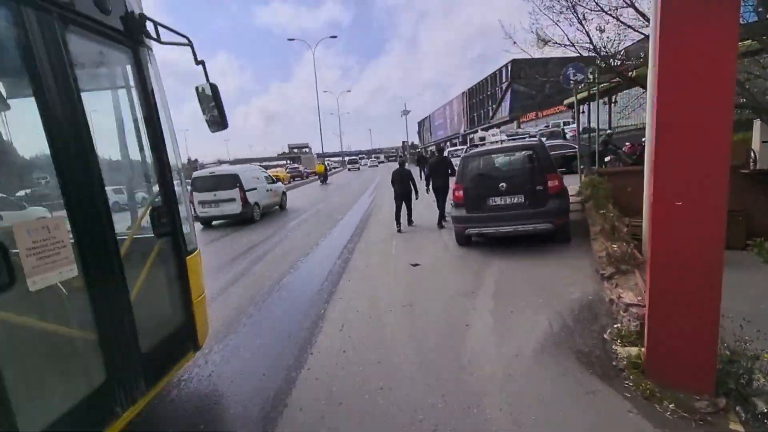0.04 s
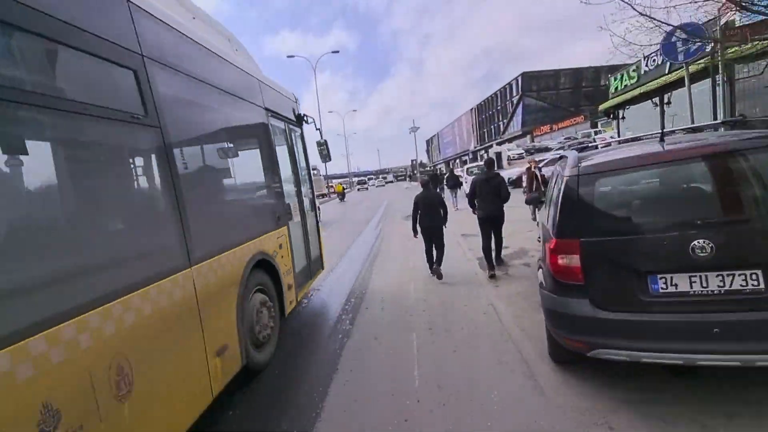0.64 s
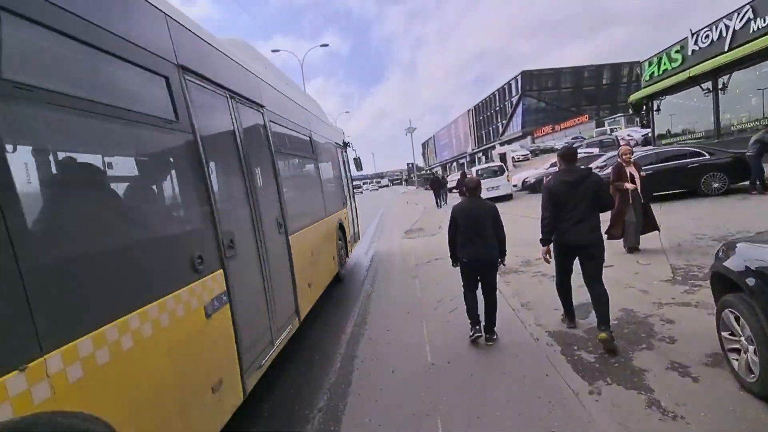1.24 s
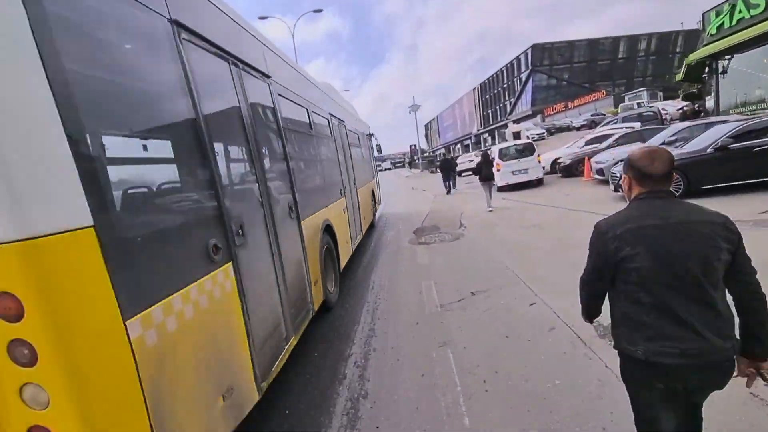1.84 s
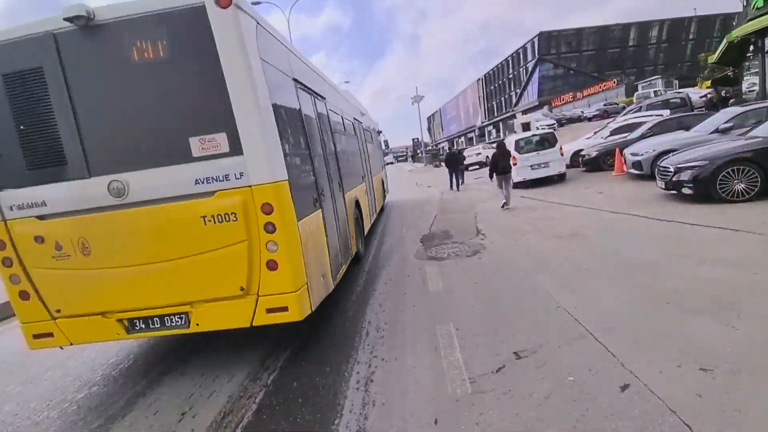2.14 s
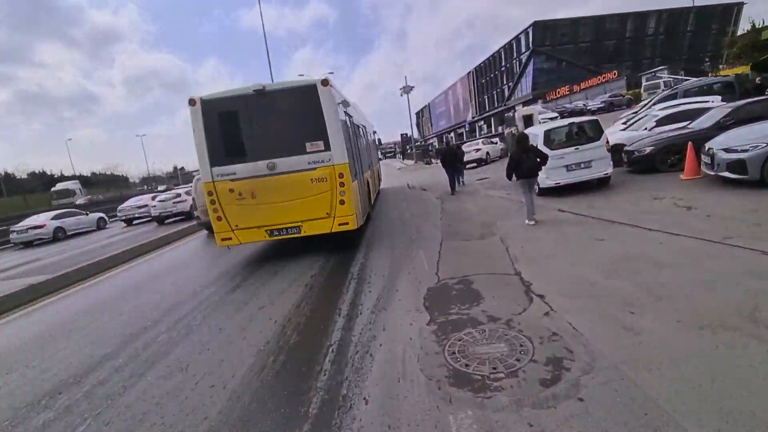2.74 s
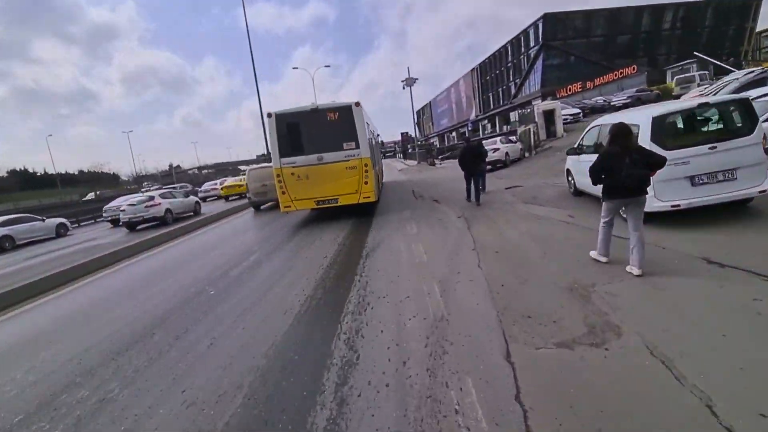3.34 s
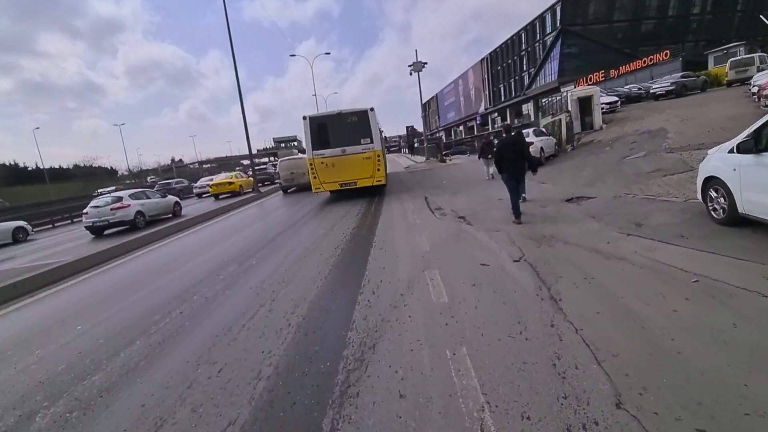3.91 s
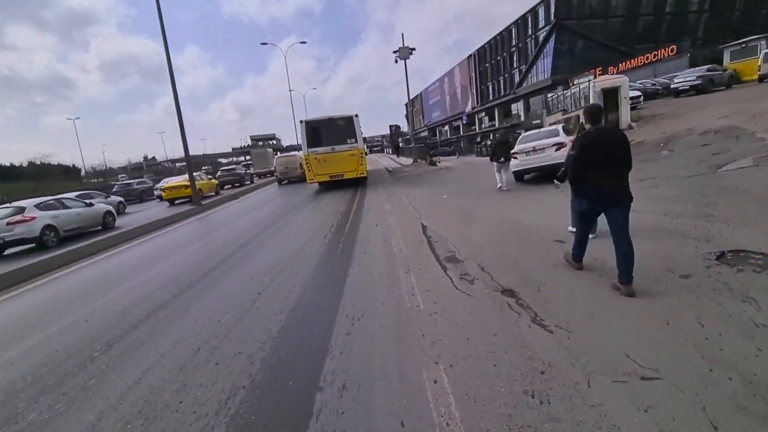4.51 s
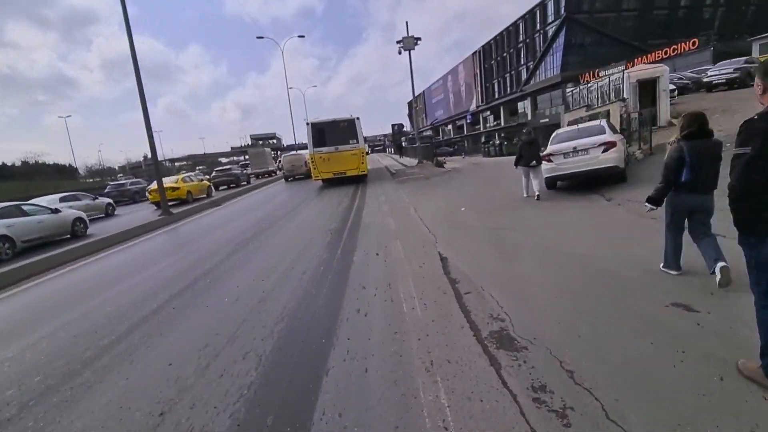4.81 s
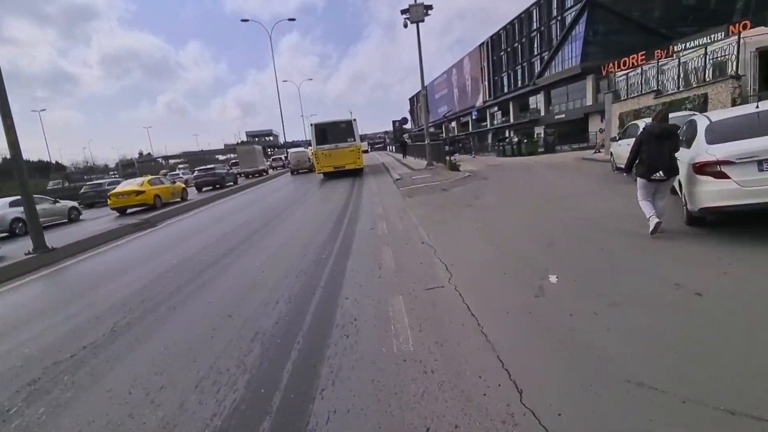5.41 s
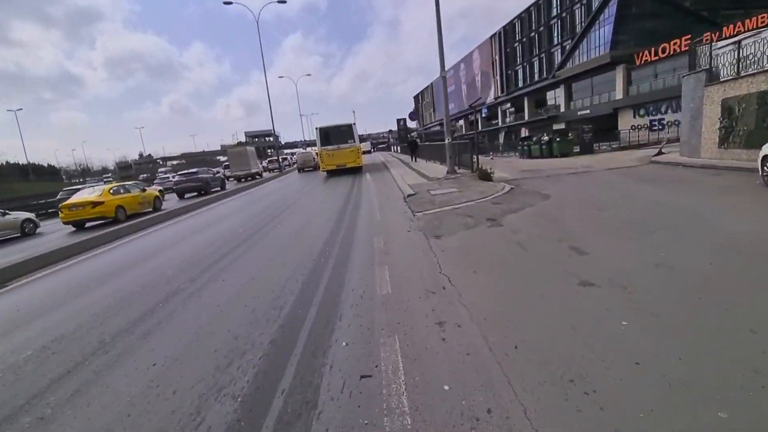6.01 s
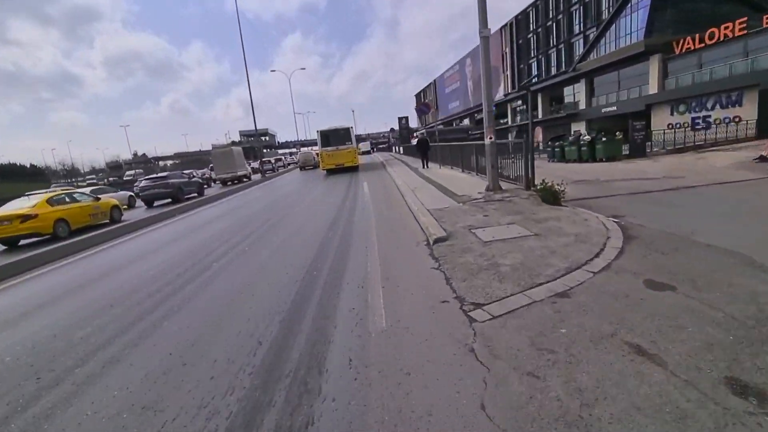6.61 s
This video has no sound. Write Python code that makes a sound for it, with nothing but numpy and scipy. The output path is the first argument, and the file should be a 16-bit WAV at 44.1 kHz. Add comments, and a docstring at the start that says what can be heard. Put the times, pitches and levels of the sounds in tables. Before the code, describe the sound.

Heard from a moving scooter, a low wavering engine drone mixes with the roar of city traffic. A bus passes close on the left with a short diesel knock and two swells of wet tyre hiss, then fades ahead. Rumbling wind gusts hit the microphones as the scooter's pitch slowly rises, and the tyres of oncoming cars ring briefly at the end. The right channel is duller.

```python
"""A scooter gathers speed on a wet city road: its exhaust drones, its belt whines, its gears hum.
A bus overtakes close on the left, its tyres throwing hissing spray, then draws away into the traffic roar.
A diesel engine knocks in the first second; near the end, the tyres of oncoming cars ring.
Gusts of wind buffet the rider's two microphones more and more; the right one is muffled."""
import sys
import numpy as np
from scipy import signal
from scipy.fft import rfft, irfft
from scipy.io import wavfile
from scipy.ndimage import map_coordinates

SR = 44100
rng = np.random.default_rng(int(sys.argv[2]) if len(sys.argv) > 2 else 0)


def inscribe(sig):
    """Save sig as 16-bit PCM at rate SR to the path in sys.argv[1].

    A 1-D sig is mono; a 2-D sig holds one channel per row.
    Samples are clipped to [-1, 1] before scaling.
    """
    pcm = np.round(np.clip(np.atleast_2d(sig).T, -1, 1) * 32767)
    wavfile.write(sys.argv[1], SR, pcm.astype(np.int16))


N = 293706
TIME = np.arange(N) / SR
FREQ = np.maximum(np.arange(N // 2 + 1) * SR / N, 1)
TOP_HZ = 15700  # the microphones cut off above this

# bus wheels going by: alongside_s, passing_s (time to get 45 degrees ahead), spray_db, rush_db
BUS_WHEELS = [(.5, 0.42, -34.5, -35), (1.53, 0.56, -32, -42)]


def exhaust(phase):
    """The scooter's silencer leaves a deep, wavering drone with fainter overtones above it."""
    # slow rise and fall of the drone: time_s, level_db
    drone_levels = [(0, -23), (.1, -15), (.5, -12), (2.0, -12.5), (3.12, -14.5), (3.32, -17.5),
                    (3.75, -18.5), (3.95, -15.5), (4.5, -16.5), (5.5, -20), (6.2, -25.5), (6.66, -19.5)]
    # brief dips of the drone: start_s, length_s, depth_db
    dips = [(4.02, 0.41, 6.5), (4.732, 0.16, 7), (5.092, 0.066, 6), (5.607, 0.15, 4), (5.809, 0.28, 15)]
    # the tone an octave above the drone: time_s, level_db
    octave_levels = [(0, -30), (.5, -29), (.65, -35), (1.2, -34), (1.65, -30.5), (2.1, -34.5), (2.78, -30),
                     (2.95, -38), (3.8, -33), (4.5, -40), (5.5, -37), (6.0, -46), (6.66, -38)]
    # higher overtones: pitch_multiple, relative_db
    overtone_levels = [(3, -6.5), (4, -10), (5, -8), (6, -9.5)]
    drone_db, = curves(drone_levels)
    dip_db = sum(db * (fade_in(s, .012) - fade_in(s + length, .012)) for s, length, db in dips)
    drone = np.sin(phase) * gain(drone_db - dip_db + .38 * wander(8))
    octave = np.sin(2 * phase) * gain(*curves(octave_levels))
    overtones = sum(gain(db + 1.6 * wander(1.2)) * np.sin(multiple * phase + rng.uniform(0, 2 * np.pi))
                    for multiple, db in overtone_levels)
    overtones *= gain(-34 - 6 * fade_in(3.1, .38))  # they sink once the wind is up
    return np.sqrt(2) * (drone + octave + overtones)


def drive():
    """The scooter's belt whines along with the engine; its gears hum along with the road speed."""
    # belt whine: time_s, pitch_hz, level_db
    belt = [(0, 412, -33), (.5, 415, -34), (.65, 414, -41), (.9, 414, -36), (1.15, 410, -41),
            (1.33, 400, -35), (1.55, 403, -31), (1.75, 406, -35), (2.2, 410, -35), (3.0, 420, -37),
            (3.9, 435, -40), (4.5, 433, -46), (6.66, 457, -44)]
    # gear hum: time_s, pitch_hz, level_db
    gears = [(0, 200, -39), (.6, 203, -39), (.85, 202, -34), (1.15, 200, -36), (1.4, 200, -42),
             (3.1, 209, -41), (3.7, 224, -39), (4.25, 243, -36), (4.5, 250, -45), (4.8, 256, -39),
             (5.5, 268, -45), (6.0, 280, -48), (6.66, 295, -41)]
    return whine(belt, wobble=.0015, flutter_db=1.2) + whine(gears, wobble=.0105, flutter_db=3.5)


def whine(table, wobble, flutter_db):
    """A turning part makes one tone, a little unsteady in pitch and loudness."""
    hz, db = curves(table)
    return np.sqrt(2) * np.sin(spin(hz, wobble)) * gain(db + flutter_db * wander(8.9))


def bus_engine():
    """As the side and tail of the bus go by, different overtones of its engine stand out."""
    # how fast the engine fires: time_s, rate_hz
    firing_rates = [(1.3, 56.98), (1.9, 57.6), (2.3, 59.2), (2.7, 59.8), (3.0, 61.5)]
    # its overtones: pitch_multiple, loudest_s, width_s, level_db
    overtones = [(4, 1.8, 0.66, -34.5), (5, 2.65, 0.28, -36), (6, 1.76, 0.39, -36)]
    phase = spin(*curves(firing_rates), wobble=.003)
    return sum(np.sqrt(2) * np.sin(multiple * phase) * swell(s, width) * gain(db + 1.5 * wander(9.1))
               for multiple, s, width, db in overtones)


def spray():
    """Countless droplets fly off each wet bus tyre and trail behind in a hissing cloud."""
    # tone of the spray: pitch_hz, relative_db
    spray_tone = [(1200, -26), (2400, -7), (3100, 1.5), (4400, 1.5), (5300, -1.5), (6300, -0.5), (6900, -2),
                  (7300, 2), (8200, -1), (9100, 0.5), (9900, -3), (10600, -2.5), (13500, -3), (15500, -6)]
    drop_sizes = np.minimum(rng.exponential(size=N // 16 + 1), 6)
    drops = stereo_noise(shared=.15) * gain(1.23 * np.repeat(drop_sizes, 16)[:N])
    hiss = shape_tone(spray_echo(drops), spray_tone)
    # the finest hiss is lost as the bus draws away
    far = np.clip((TIME - .94) / 1.3, 0, 1)
    hiss = (1 - far) * hiss + far * shape_tone(hiss, [(7000, 0), (13000, -7)])
    hiss = normalise(shimmer(hiss, band_hz=700, depth_db=1.3, rate_hz=9))
    trail_s, cloud_s = .022, 2.214  # the spray's lag behind a wheel; when the cloud is nearest
    wheels = [gain(db) * pass_by(s + trail_s, passing_s) for s, passing_s, db, _ in BUS_WHEELS]
    cloud = gain(-31) * swell(cloud_s, .5)
    wet_road = gain(-39 - 2 * np.abs(TIME - cloud_s))
    return hiss * combine(*wheels, cloud, wet_road)


def spray_echo(hiss):
    """A surface by the microphones reflects the hiss, later as a wheel moves ahead: the whoosh falls."""
    # each wheel's echo: alongside_s, passing_s, strongest_s, width_s, strength (0-1)
    echoes = [(.277, .868, .73, .29, .31), (1.4, .517, 1.636, .21, .21)]
    side_lag_s, ahead_lag_s, edge_lag_s = .000131, .000304, .000055
    # from about 2.4 s on, a steady echo sets in
    out = hiss + .17 * fade_in(2.41, .12) * delay(hiss, lag_s=.000284)
    for alongside_s, passing_s, strongest_s, width_s, strength in echoes:
        angle = np.arctan((TIME - alongside_s) / passing_s)
        lag_s = side_lag_s + (ahead_lag_s - side_lag_s) * np.sin(angle)
        lag_s *= 1 + .02 * wander(7)
        # the surface's edge sends back an upside-down copy
        echo = delay(hiss, lag_s) - .5 * delay(hiss, lag_s + edge_lag_s)
        shake = 1 + .22 * wander(10)  # the echo comes and goes as the microphones shake
        out += strength * swell(strongest_s, width_s) * shake * echo
    return out


def wind():
    """Swirling air rumbles on the microphones and comes in gusts; a few hit hard."""
    # tone of the wind: pitch_hz, relative_db
    wind_tone = [(15, -26), (30, -12.5), (55, 2), (90, 3), (140, -1), (220, -4), (400, -19.5), (1000, -66),
                 (6000, -95)]
    # long swells and hard buffets: peak_s, level_db, width_s
    gusts = [(0.205, -26, 0.23), (0.81, -26.5, 0.12), (1.296, -27, 0.094), (1.68, -32, 0.072),
             (2.793, -36, 0.16), (3.712, -27.5, 0.27), (4.217, -24.5, 0.064), (4.907, -24, 0.18),
             (5.303, -28.5, 0.16), (5.519, -16, 0.0068), (5.611, -23, 0.05), (6.48, -27, 0.17)]
    rumble = toned_noise(wind_tone, shared=.71)
    strength = gain(-36) + sum(gain(db) * swell(s, width) for s, db, width in gusts)
    return rumble * strength * gain(.5 * wander(26))


def traffic(scooter_phase):
    """Engines and wheels roar and tyres rush, louder beside the bus, pulsing faintly with the scooter."""
    # tone of the low roar: pitch_hz, relative_db
    roar_tone = [(60, -1.5), (150, -2), (220, -2), (320, 1.5), (480, -0.5), (630, -4), (850, -12),
                 (1300, -12.5), (8000, -61)]
    # tone of the tyre rush: pitch_hz, relative_db
    rush_tone = [(500, -9.5), (920, -2.5), (1180, 2), (1550, -4), (1900, -5.5), (2400, -9), (3050, -8.5),
                 (4200, -16.5), (6000, -23), (15000, -52)]
    beside_bus = 1 - fade_in(2.5, .25)
    wheels = [gain(db) * pass_by(s, passing_s) for s, passing_s, _, db in BUS_WHEELS]
    roar_gain = combine(gain(-27 - .27 * TIME), gain(-27.5) * beside_bus)
    rush_gain = combine(gain(-34), gain(-28.5) * beside_bus * fade_in(.044, 1), *wheels)
    roar = toned_noise(roar_tone, shared=.98) * roar_gain * gain(.13 * wander(3.2))
    rush = toned_noise(rush_tone, shared=.38) * rush_gain * gain(.73 * wander(32))
    return (roar + rush) * (1 + .046 * np.cos(scooter_phase))


def noise_swells():
    """Short swells of low rumble, rush and high hiss, each around one pitch."""
    # the swells: peak_s, width_s, pitch_hz, spread_hz, level_db
    swells = [(.154, 0.54, 710, 164, -30), (1.254, 0.26, 660, 260, -28.5), (0.603, 0.1, 6200, 400, -40),
              (0.687, 0.058, 11500, 3200, -41), (0.748, 0.065, 9200, 270, -37.5),
              (1.022, 0.029, 10500, 2500, -37), (1.24, 0.052, 201, 24, -26.5),
              (4.23, 0.097, 240.5, 13, -27.5), (1.3, 0.12, 3100, 220, -39.5), (1.49, 0.087, 6500, 900, -39),
              (1.53, 0.13, 4400, 230, -38.5), (1.782, 0.046, 4960, 360, -42), (1.98, 0.17, 7000, 1300, -41),
              (1.9, .08, 2600, 900, -37), (2.22, 0.15, 1210, 52, -36), (2.62, 0.19, 3680, 550, -38.5),
              (3.08, .03, 11500, 2500, -45), (3.7, 0.2, 3300, 600, -44.5), (3.86, .1, 2880, 170, -44),
              (4.67, .14, 6000, 210, -49.5), (4.98, .09, 5850, 400, -51), (4.75, 0.23, 2900, 450, -46),
              (5.97, 0.05, 2000, 200, -43)]
    # brief rings in the oncoming traffic: peak_s, width_s, pitch_hz, spread_hz, level_db
    rings = [(5.74, .025, 1230, 16, -38), (5.885, .012, 1720, 50, -42), (5.975, .022, 1570, 80, -32),
             (6.1, .024, 1570, 65, -32)]
    out = 0
    for peak_s, width_s, pitch_hz, spread_hz, db in swells + rings:
        band = np.exp(-.5 * ((FREQ - pitch_hz) / spread_hz) ** 2)
        noise = irfft(rfft(stereo_noise(shared=.11)) * band, N)
        out += normalise(noise) * gain(db) * swell(peak_s, width_s)
    return out * gain(1.5 * wander(50))  # a fast flutter makes them rasp


def diesel_knock():
    """A diesel engine knocks close by in the first second, then fades; each firing rings its block."""
    # strength of each cylinder, in firing order: relative_db
    cylinders = [-1.3, .3, -.7, .8]
    # the hardest knocks: start_s, extra_db
    hard_knocks = [(.029, 3.5), (.125, 6), (.299, 2.5), (.338, 3), (.376, 2), (.55, 2.5), (.628, 3.5),
                   (.647, 3), (.879, 6)]
    # ring of the block: pitch_hz, relative_db
    block_tone = [(400, -25), (1000, -5), (1450, 3), (1750, -3), (2080, 4), (2450, -9), (3100, 0),
                  (3800, -7.5), (5300, -12), (6200, -6), (6800, -13), (7450, -8), (8500, -21), (15000, -32)]
    first_s, firing_hz, decay_s = .0095, 51.77, .0024
    cycles = (TIME - first_s) * firing_hz
    knock_number = np.floor(cycles).astype(int)
    since_knock_s = (cycles % 1) / firing_hz
    hard_db = sum(db * (knock_number == round((s - first_s) * firing_hz)) for s, db in hard_knocks)
    chance_db = .7 * rng.standard_normal(N // 100)[knock_number]
    strength = gain(np.take(cylinders, knock_number, mode="wrap") + hard_db + chance_db)
    knocks = stereo_noise(shared=.96) * strength * np.exp(-since_knock_s / decay_s)
    return normalise(shape_tone(knocks, block_tone)) * gain(-32.3) * swell(peak_s=.35, width_s=.4)


def oncoming_cars():
    """Cars in the far lanes come nearer, their tyres ringing unevenly."""
    # ring of their tyres: pitch_hz, relative_db
    tyre_tone = [(600, -25), (950, -19), (1200, -3), (1550, 9), (1900, -0.5), (2500, -2.5), (3000, -13),
                 (3800, -18.5), (6000, -21), (15000, -56)]
    tyres = toned_noise(tyre_tone, shared=.37)
    return tyres * swell(peak_s=6.17, width_s=1) * gain(-36.5 + 2 * wander(27))


def gain(db):
    """Turn decibels into a number to multiply by."""
    return 10 ** (np.asarray(db) / 20)


def combine(*gains):
    """The overall gain of unrelated sounds: their powers add up."""
    return np.sqrt(sum(g ** 2 for g in gains))


def normalise(x):
    """Scale a sound to an average power of 1."""
    return x / np.sqrt(np.mean(x ** 2))


def curves(table):
    """Join a table's rows with straight lines in time: one curve for each column after the first."""
    times, *columns = np.transpose(table)
    return [np.interp(TIME, times, column) for column in columns]


def fade_in(middle_s, width_s):
    """A soft step from 0 to 1."""
    return .5 + .5 * np.tanh(.5 * (TIME - middle_s) / width_s)


def swell(peak_s, width_s):
    """A bell-shaped rise and fall, down to about 0.6 at width_s either side of the peak."""
    return np.exp(-.5 * ((TIME - peak_s) / width_s) ** 2)


def pass_by(alongside_s, passing_s):
    """A wheel is loudest alongside, and fainter with distance and as its side turns away."""
    return 1 / (1 + ((TIME - alongside_s) / passing_s) ** 2)


def wander(rate_hz):
    """A smooth random curve of typical size 1, changing about rate_hz times a second."""
    return normalise(irfft(rfft(rng.standard_normal(N)) * np.exp(-(FREQ / rate_hz) ** 2), N))


def spin(hz, wobble):
    """The phase (angle turned) of a shaft whose speed wavers a little."""
    return 2 * np.pi * np.cumsum(hz * (1 + wobble * wander(9))) / SR


def stereo_noise(shared):
    """Noise at the two microphones, with a share (0-1) common to both."""
    noise = rng.standard_normal((3, N))
    return np.sqrt(shared) * noise[0] + np.sqrt(1 - shared) * noise[1:]


def shape_tone(x, tone):
    """Turn pitches up or down along a list of (pitch_hz, relative_db) points."""
    hz, db = np.transpose(tone)
    return irfft(rfft(x) * gain(np.interp(np.log(FREQ), np.log(hz), db)), N)


def toned_noise(tone, shared):
    """Stereo noise with the given tone and an average power of 1."""
    return normalise(shape_tone(stereo_noise(shared), tone))


def delay(x, lag_s):
    """Make both channels arrive later."""
    return np.array([map_coordinates(channel, [(TIME - lag_s) * SR], order=3) for channel in x])


def shimmer(x, band_hz, depth_db, rate_hz):
    """Let each band of pitches in a hiss swell and sink on its own."""
    spectrum = rfft(x)
    out = 0
    for hz in np.arange(0, TOP_HZ + band_hz, band_hz):
        band = np.maximum(1 - np.abs(FREQ - hz) / band_hz, 0)
        out += irfft(spectrum * band, N) * gain(depth_db * wander(rate_hz))
    return out


def scene():
    """Scooter, street, spray and wind at the two microphones."""
    # the scooter's engine speeding up: time_s, pitch_hz
    engine_pitch = [(0, 63.2), (1.0, 64.7), (1.3, 65.3), (2.4, 65.4), (3.0, 66.8), (3.7, 67.9), (4.6, 69.9),
                    (5.6, 72.3), (6.66, 73.2)]
    phase = spin(*curves(engine_pitch), wobble=.0013)
    scooter = drive() + exhaust(phase)
    street = bus_engine() + diesel_knock() + traffic(phase) + oncoming_cars() + noise_swells()
    return scooter + street + spray() + wind()


def record(dry):
    """The right microphone hears later and duller; both lose the highest treble."""
    # muffling on the right: pitch_hz, change_db
    muffling = [(70, .4), (130, -1), (260, -2), (650, -4.3), (1300, -4), (2000, -7.3), (4400, -11.5),
                (6000, -19.5), (8400, -30), (10000, -23), (11800, -20), (13000, -7.5), (15500, -6.5)]
    # how far the right trails the left: pitch_hz, lag_radians
    phase_lags = [(66, .68), (350, .8), (700, 1.26), (1400, 1.75), (3000, 1.85)]
    left, right = dry
    lag = np.interp(FREQ, *np.transpose(phase_lags))
    right = irfft(rfft(shape_tone(right, muffling)) * np.exp(-1j * lag), N)
    low_pass = signal.ellip(10, .1, 90, TOP_HZ, fs=SR, output="sos")
    return signal.sosfilt(low_pass, np.array([left, right]))


dry = scene()
out = record(dry)
inscribe(out)
```